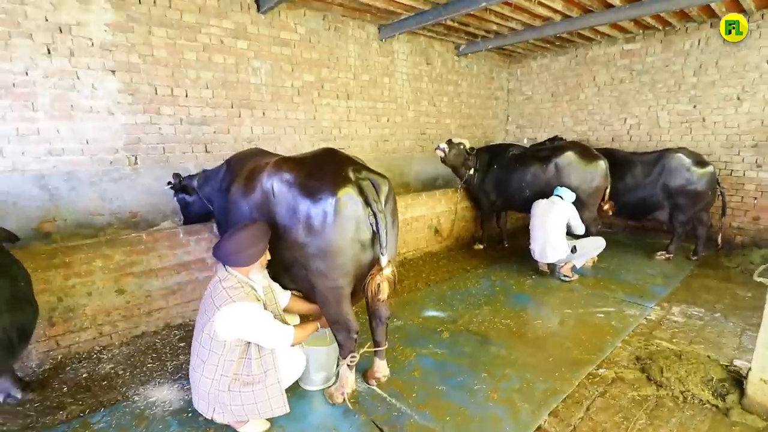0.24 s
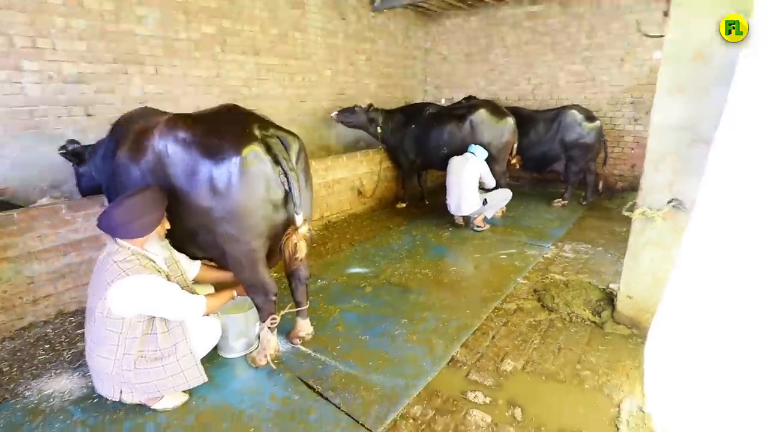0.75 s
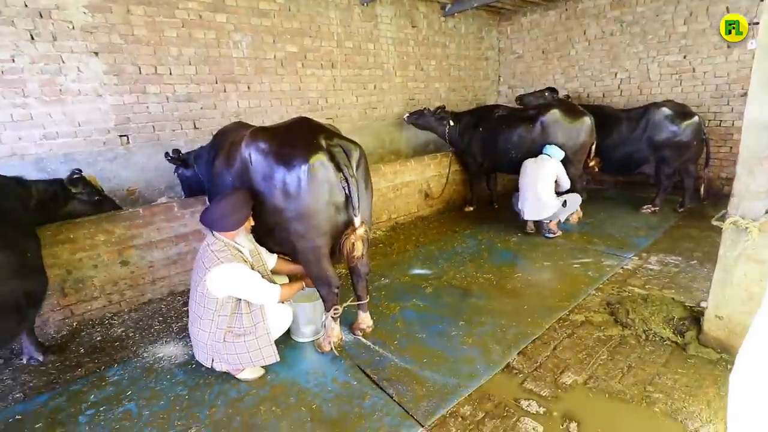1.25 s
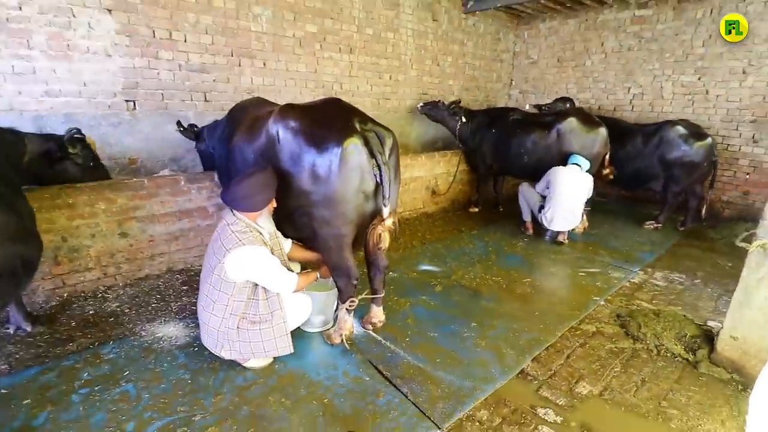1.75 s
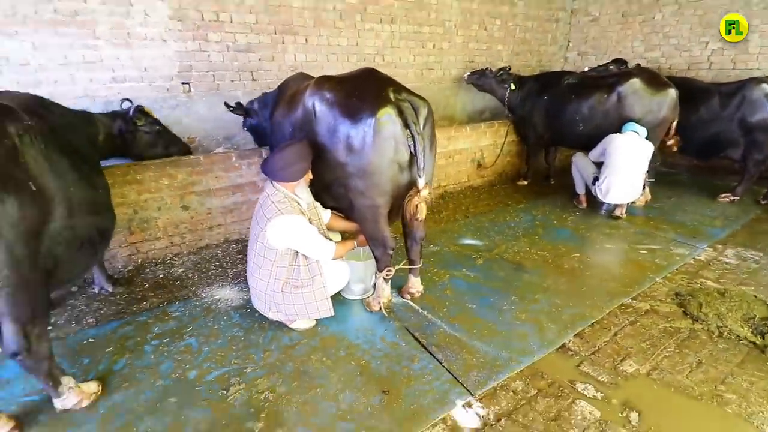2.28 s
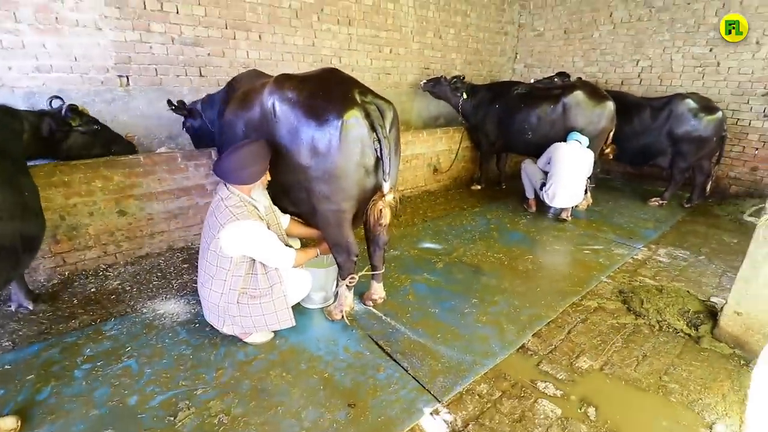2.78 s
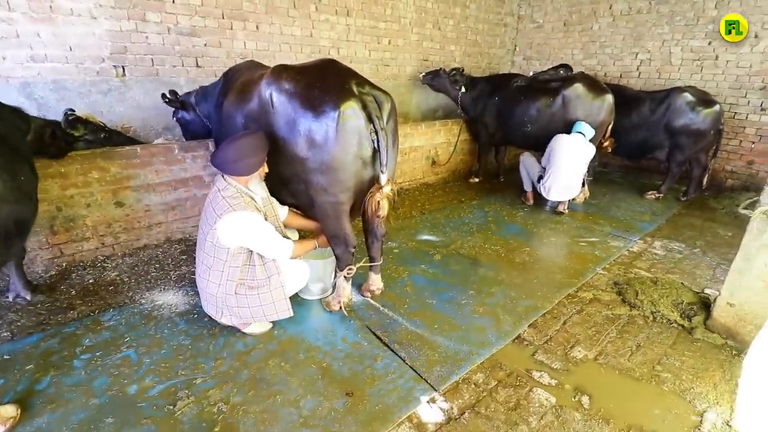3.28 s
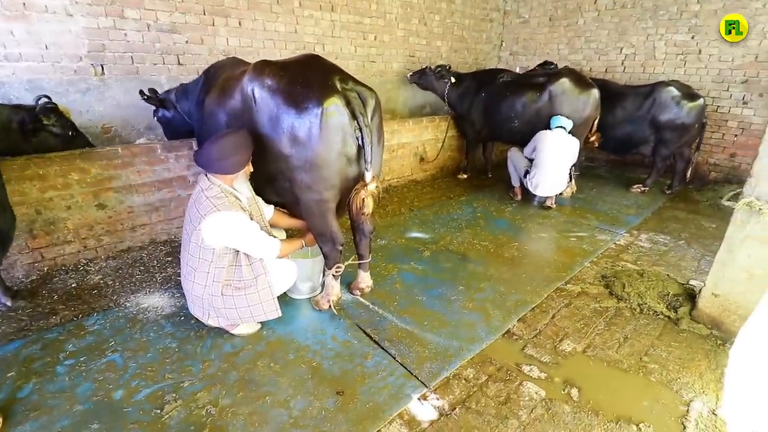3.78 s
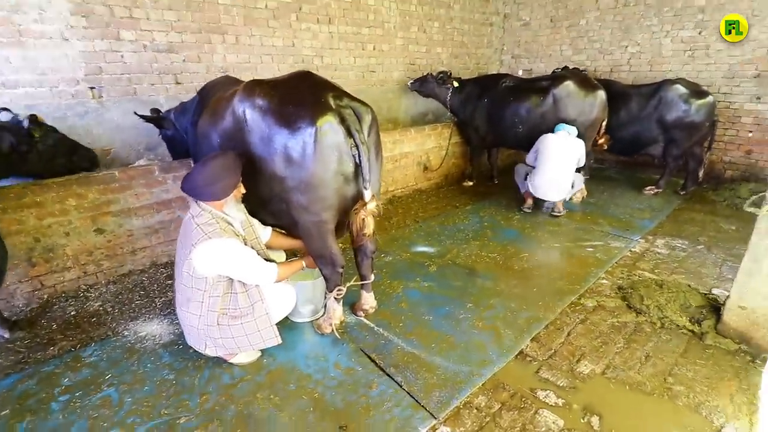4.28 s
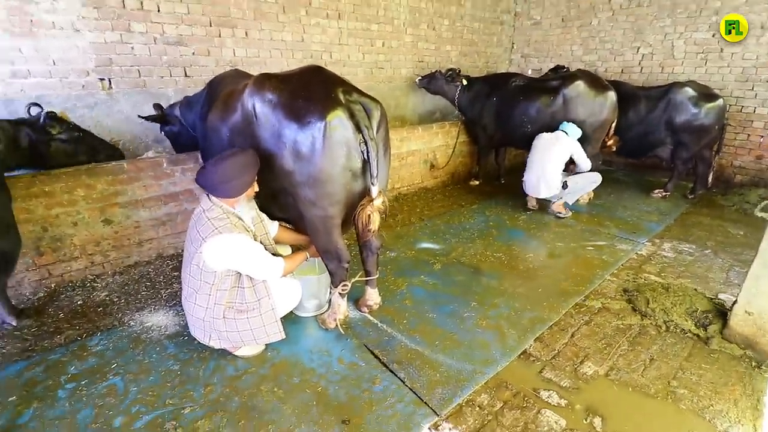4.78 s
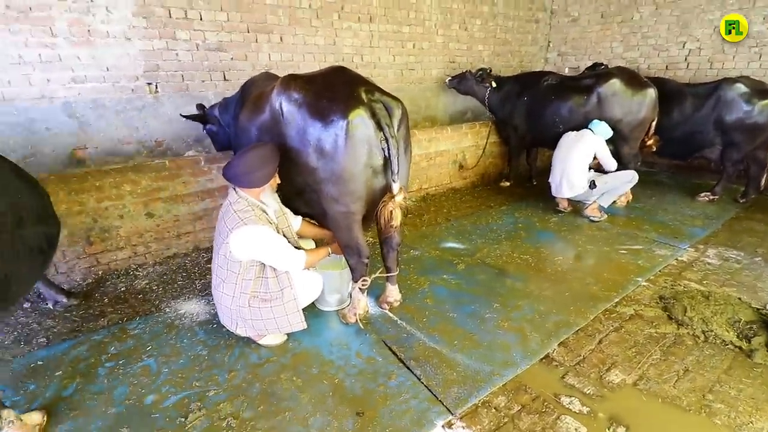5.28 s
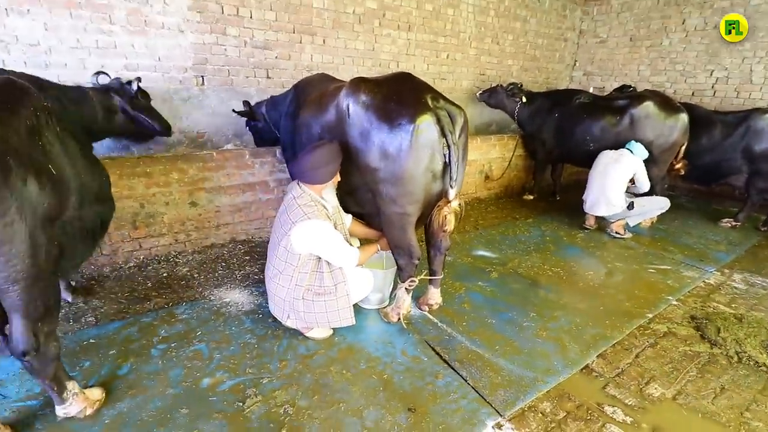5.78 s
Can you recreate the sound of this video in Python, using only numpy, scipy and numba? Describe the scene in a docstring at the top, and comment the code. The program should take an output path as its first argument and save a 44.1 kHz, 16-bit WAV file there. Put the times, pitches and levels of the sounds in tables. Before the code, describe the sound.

A handheld phone in a brick animal shed picks up milk squirting into a frothy metal bucket. A soft, bright hiss runs throughout, spluttering and dipping briefly between squirts, with faint pail resonance. From 0 to 0.8 s many tiny high bubbles and drips blip over it, with close finger ticks near 0.1 s. At 1.25 s a wet, plinking splash stands out, followed by busy bubbling until about 2 s; a tick and snap fall at 1.7 s. Thin faint squeaks flutter around 2.3 to 2.7 s, and small sharp spits recur. A double snap clicks at 3.37 s. Drips become sparse. At 4.63 s a soft scuff precedes a loud, hard clack at 4.75 s, with quick duller bounces until 4.81 s and a short rattle. The hiss continues to 6 s, with a few spits and drips over a very quiet low hum and dull thumps.

```python
"""Hand milking in a brick shed

Jets of milk hiss into the froth of a metal bucket: noise and tiny rings drive the bucket's resonances.
Gliding sine rings make bubbles, drips and squeaks; puffs of filtered noise make spits and splashes.
Beneath lie a murmur and a wavering low hum with dull thumps, from filtered noise and low rings.
Fingers tick and snap on a phone; after a soft scuff, a hard object clacks and bounces as ringing modes.
"""
import sys
import numpy as np
from scipy import signal
from scipy.fft import rfft, irfft
from scipy.io import wavfile
from scipy.ndimage import uniform_filter1d
from numba import njit

SR = 44100
rng = np.random.default_rng(int(sys.argv[2]) if len(sys.argv) > 2 else 0)


def master_out(mix):
    """Clip the mix to full scale and print it as 16-bit PCM to the path in sys.argv[1]."""
    frames = np.transpose(np.atleast_2d(mix))
    ceiling = np.clip(frames, -1, 1)
    pcm = np.round(ceiling * 32767).astype(np.int16)
    wavfile.write(sys.argv[1], SR, pcm)


N = 266408

# murmur of the shed, relative spectrum: (pitch_hz, level_db per Hz)
SHED_COLOUR = [(15, -61), (25, -19), (70, -14), (113, -10.5), (173, -14), (341, -14.5), (532, -14),
               (1080, -14.5), (1300, -8), (1690, -36), (2860, -120)]
SHED_EDGES_HZ = [20, 170, 350, 700, 1250]
# level before the slow swell; side level relative to the middle
SHED_DB, SHED_SIDE_DB = -69.5, -23.5

# level of the low hum: (start_s, level_db)
HUM_LEVELS = [(0.0, -54), (0.32, -64), (0.6, -76), (0.94, -66.5), (1.09, -72), (1.39, -77), (1.58, -67),
              (1.64, -63), (1.69, -60), (1.77, -68), (2.0, -67), (2.1, -75), (2.4, -63.5), (2.58, -79.5),
              (2.73, -62.5), (2.81, -72), (3.33, -74), (3.38, -81), (3.6, -87), (3.64, -70.5),
              (3.97, -74.5), (4.05, -61.5), (4.22, -71.5), (4.37, -68.5), (4.91, -70.5), (5.25, -71.5),
              (5.38, -67), (5.6, -71.5), (6.04, -80)]
HUM_HZ, HUM_WIDTH_HZ = 118.2, 28.4  # the width of each of two equal resonances in a row

# thumps that ring near the pitch of the hum: (start_s, peak_db, pitch_hz, t60_s)
THUMP_EVENTS = [(0.083, -60, 119, 0.15), (0.155, -59, 114, .18), (0.224, -58, 118, .18),
                (0.41, -56, 116.5, 0.2), (0.752, -56, 110, 0.13), (0.923, -54.5, 116, 0.12),
                (1.593, -46, 122, 0.092), (1.958, -55, 126, 0.13), (2.389, -58, 113, .18),
                (2.515, -54, 110, 0.19), (4.277, -52, 127, 0.2), (4.356, -50.5, 121, 0.17),
                (5.012, -53.5, 116, 0.2), (5.368, -54, 120.5, 0.16), (5.571, -49, 114.7, 0.24)]

# soft scuff ahead of the clack, with its relative spectrum: (pitch_hz, level_db)
SCUFF_S, SCUFF_DB, SCUFF_ATTACK_S, SCUFF_T60_S = 4.625, -47, .008, 0.22
SCUFF_COLOUR = [(750, -8), (1000, 2), (1500, -7), (2200, -6), (3500, -8), (5000, -10), (9000, -12)]

# finger ticks: (start_s, peak_db, pitch_hz, t60_s, undertone_db relative to the tick)
TICK_EVENTS = [(0.103, -40, 470, .026, -8.5), (0.14, -53, 209, 0.032, 0), (0.259, -53, 287, .02, -11),
               (0.604, -60.5, 403, 0.029, 3), (0.956, -61, 930, .028, -11), (1.245, -51, 790, 0.016, -5),
               (1.584, -54, 424, 0.027, -16), (1.594, -54, 373, 0.033, -10), (1.7215, -42, 572, 0.018, -17),
               (1.909, -58, 376, 0.044, -2), (2.001, -61.5, 376, 0.042, 3.5),
               (3.374, -46.5, 1015, 0.015, -1.5), (3.376, -49.5, 756, .014, -8),
               (4.289, -53.5, 204, 0.021, -6), (4.361, -56.5, 306, 0.036, 3),
               (4.392, -50.5, 216, 0.039, -4), (4.53, -58, 947, 0.037, -5), (4.659, -54, 980, .04, -16),
               (4.777, -56, 1100, .025, -15), (4.75, -49.5, 295, 0.062, -7),
               (4.873, -50, 850, 0.0066, -3.5)]
TICK_OVERTONE_DB = -6.5  # relative to the tick
FAINT_TICK_DB, FAINT_TICKS_END_S = -62, 2.8  # middle of their peak levels; latest start

# sharp one-sided snaps, levels ahead of the bass cut: (start_s, peak_db)
SNAP_EVENTS = [(0.1056, -41), (1.7248, -38), (1.7266, -35.5), (1.7304, -48), (2.762, -50), (3.371, -47),
               (3.376, -40), (3.378, -35), (3.3801, -38), (4.534, -45), (4.627, -54), (4.8772, -46)]
SNAP_WIDTH_S, SNAP_LOW_HZ = 0.000081, 352

# clack and bounces: (start_s, ring_db, tuning_ratio of the low modes, treble_db relative,
# rattle_db, rattle_t60_s)
CLACK_EVENTS = [(4.7452, -11.5, 1, -1.5, -27.5, 0.12), (4.7652, -39, 1.1, 10, -41, .02),
                (4.7815, -33, 0.94, 4, -37, 0.034), (4.793, -26, 0.87, -15, -33, 0.05),
                (4.7965, -37, .9, -20, -38, .04), (4.802, -37, 0.95, -26, -34, 0.035),
                (4.806, -34, 0.73, -30, -35, 0.054)]
# modes of the hard object: (pitch_hz, level_db relative to ring_db, t60_s, swell_s)
OBJECT_MODES = [(2226, -9.5, 0.024, 0.0049), (2700, -6.5, 0.022, 0.003), (2964, -1, 0.011, 0.00173),
                (3470, -16, 0.035, 0.0018), (4600, -20, 0.066, .003), (5090, -14.5, 0.025, 0.00099),
                (5950, -15, 0.019, 0.0012), (6400, -27, 0.065, 0.024), (6740, -29, 0.077, 0.017),
                (9380, -24, 0.03, 0.0033), (12360, -21, 0.06, .008), (13200, -20, 0.09, 0.0077),
                (13700, -25, .05, .006), (15010, -30, .06, .002)]
# relative spectrum of the rattle: (pitch_hz, level_db)
RATTLE_COLOUR = [(900, -25), (1400, -15), (2200, -8), (4000, -7.5), (6500, -9.0), (8000, -12),
                 (11000, -10.0), (13000, -8), (14000, -8), (16000, -3.5)]
BOUNCE_SCATTER_DB = 1.5  # each bounce excites the modes a little differently
CLACK_FLUTTER_DB = 6.5  # scales the random flutter of the high modes

# faint thin squeaks, levels ahead of the flutter: (start_s, peak_db, pitch_hz, length_s, rise_share)
SQUEAK_EVENTS = [(.56, -66, 2190, 0.15, .013), (.60, -55.5, 1850, 0.12, 0.017),
                 (2.27, -49, 1790, .035, .02), (2.305, -53, 1830, .03, .015),
                 (2.33, -49.5, 1840, 0.04, 0.02), (2.5, -62, 4450, 0.079, -0.00013),
                 (2.51, -61, 1900, 0.037, -0.0057), (2.545, -60, 1830, .035, -.02),
                 (2.585, -57, 1750, .025, -0.015), (2.61, -56, 1786, 0.033, -0.017),
                 (2.72, -56, 1880, 0.026, 0.049)]

# drops of spray that spit against the rim: (start_s, approximate peak_db, pitch_hz)
SPIT_EVENTS = [(1.8845, -35, 8200), (2.3366, -36.5, 9300), (2.6444, -36, 13100), (2.8986, -32.5, 8700),
               (2.9836, -41, 8424), (3.85, -35, 8350), (3.9335, -35, 9900), (4.0337, -36, 14500),
               (5.2724, -35, 11800), (5.5807, -38, 8500)]
FAINT_SPIT_DB = -43  # middle of their levels
PUFF_SAMPLES = 900

# splashes around the largest drips: (start_s, level_db, t60_s)
SPLASH_EVENTS = [(1.241, -36, 0.12), (1.254, -44, .06), (1.262, -29, 0.029)]
# relative spectrum of the splashes: (pitch_hz, level_db)
SPLASH_COLOUR = [(1500, -11), (2500, -2.0), (6500, -3.5), (8000, -12), (12000, 5.0), (14000, -7), (16000, -6)]

# loud bubbles and drips: (start_s, peak_db, pitch_hz, length_s, rise_share)
BUBBLE_EVENTS = [(0.044, -33.5, 3370, 0.005, 0.03), (0.063, -41, 3250, 0.0071, 0),
                 (0.132, -39.5, 3190, 0.018, 0.058), (0.207, -50, 5900, .022, -.04),
                 (0.223, -44, 3270, 0.014, 0.016), (0.282, -49, 6450, 0.017, -.1),
                 (0.303, -44, 5100, .012, -.08), (0.307, -49, 6350, .01, -.05), (0.335, -46, 5050, .007, 0),
                 (0.381, -49, 6370, .011, .03), (0.44, -52, 5930, .012, .03), (0.583, -48, 4680, .011, 0),
                 (0.633, -47, 5670, 0.013, -0.012), (0.669, -46, 4050, 0.015, .01),
                 (0.743, -47, 4000, .009, -.03), (0.752, -47, 4050, .01, -.02), (0.788, -49, 6480, 0.01, 0),
                 (0.789, -45, 4950, .009, -.04), (0.24, -30.5, 3320, 0.0039, 0.027),
                 (0.245, -38, 3300, 0.0025, 0), (0.274, -42, 3540, 0.0083, 0.015),
                 (0.308, -43.5, 3400, 0.013, .01), (0.336, -48, 6250, 0.016, -.1),
                 (0.41, -39, 3460, 0.0053, -0.00076), (0.425, -41, 4030, 0.0064, 0.018),
                 (0.479, -41, 3290, .011, .02), (0.567, -40.5, 3290, 0.019, 0.032),
                 (0.687, -42, 1866, 0.0092, -0.0063), (0.702, -44, 4300, 0.016, -0.000026),
                 (0.765, -42, 1916, 0.011, -0.02), (0.961, -44, 1426, 0.0074, 0),
                 (1.243, -28, 2000, 0.0074, .01), (1.245, -44, 4000, .006, .02),
                 (1.247, -43, 6100, .006, 0), (1.263, -31, 1970, 0.0068, 0.071),
                 (1.262, -42, 7000, .008, 0.018), (1.266, -34, 4500, 0.0065, 0.026),
                 (1.2664, -25, 2530, 0.0032, .06), (1.2655, -39, 12100, .007, 0.04),
                 (1.2695, -39, 5300, .004, -.05), (1.25, -44, 6000, .003, 0), (1.271, -41, 4090, 0.0036, 0),
                 (1.272, -39, 2330, 0.0087, -.03), (1.273, -47, 6950, .011, 0),
                 (1.276, -40, 3580, .013, -0.097), (1.294, -44, 3120, .012, 0.048),
                 (1.341, -46, 6200, 0.0086, 0.047), (1.342, -42, 5830, 0.01, -0.027),
                 (1.347, -38.5, 4180, 0.017, 0.021), (1.357, -35.5, 4540, 0.014, -0.037),
                 (1.363, -45, 6660, 0.01, -.02), (1.386, -46, 5650, .01, -.03),
                 (1.393, -46.5, 1875, .015, 0.0093), (1.4, -40.5, 3770, .006, .03),
                 (1.422, -46, 4180, .012, -.1), (1.443, -47, 3150, 0.013, .08), (1.59, -48, 5100, .01, .04),
                 (1.789, -45, 6100, 0.0087, 0.039), (1.81, -51, 6350, .005, -.02),
                 (1.829, -44, 5150, .008, -.06), (1.918, -47, 4150, .009, 0), (1.991, -48, 6900, .01, 0),
                 (1.436, -43, 3570, 0.0057, -0.0065), (1.481, -47, 5470, 0.0089, -.02),
                 (1.482, -54, 6500, .007, .05), (1.503, -52, 6250, 0.0071, .02),
                 (1.52, -53, 6400, .009, -.02), (1.518, -43, 4810, 0.011, -0.047),
                 (1.522, -43, 1630, 0.0049, 0), (1.536, -42, 3070, 0.0095, 0.045),
                 (1.541, -50, 7100, .007, .02), (1.542, -44, 3360, 0.011, .02),
                 (1.545, -45, 4300, .014, 0.0093), (1.562, -47, 4650, .008, 0),
                 (1.569, -44, 6100, 0.0098, -.01), (1.593, -43, 7000, 0.012, .04),
                 (1.599, -40, 7330, .005, -0.014), (1.602, -38, 5580, 0.0081, .02),
                 (1.614, -42, 3600, .012, -.05), (1.618, -39, 5440, 0.0069, -.03),
                 (1.632, -40, 5560, 0.011, -.07), (1.796, -41.5, 6450, 0.011, 0.051),
                 (1.809, -37.5, 4640, 0.011, -0.09), (1.83, -43, 6360, 0.011, -0.048),
                 (1.836, -39, 4610, 0.0051, -.02), (1.881, -47, 1430, 0.017, -0.0015),
                 (1.958, -41, 3000, 0.0056, 0.0064), (1.961, -36.5, 3420, 0.0042, 0.0064),
                 (2.002, -40, 6350, 0.0068, 0.023), (2.008, -41, 4750, 0.0049, -.03),
                 (2.174, -47, 1650, 0.023, 0.0044), (2.212, -50, 1675, .018, -.03),
                 (2.241, -39, 3300, 0.0044, .02), (2.282, -53, 4550, .008, 0), (2.335, -44, 4520, .008, 0),
                 (2.435, -47.5, 1380, 0.011, 0), (2.456, -48, 5430, 0.013, -0.0078),
                 (2.507, -41.5, 3350, 0.013, 0.039), (2.53, -43, 4060, 0.0072, .06),
                 (2.646, -51, 4170, .006, .03), (2.649, -44, 4330, 0.016, .01),
                 (2.673, -42.5, 4050, 0.0095, 0.017), (2.712, -45, 4730, .008, 0),
                 (2.913, -47, 1824, 0.026, -0.0097), (2.929, -47, 5520, 0.022, 0),
                 (2.963, -42, 4820, .0079, 0.0071), (2.996, -41, 3300, 0.0049, 0.0022),
                 (3.344, -36, 3250, 0.003, 0.019), (3.346, -43, 2700, .005, 0), (3.402, -44, 3200, .004, 0),
                 (3.48, -39, 3460, 0.0031, 0), (3.672, -38.5, 3620, 0.0061, .01),
                 (4.195, -39.5, 1960, 0.0044, 0.0088), (4.631, -42, 1530, 0.0029, 0),
                 (4.641, -38, 3700, 0.0082, 0.000036), (4.642, -40, 4150, 0.0049, 0),
                 (4.722, -40, 2970, 0.0054, 0), (5.187, -42, 2760, .005, 0.0076),
                 (5.673, -41.5, 3456, 0.016, 0.003)]
# spells of random fainter bubbles: (start_s, end_s, lowest_hz, highest_hz, mean_peak_db)
FAINT_BUBBLE_SPELLS = [(0, 6.04, 2550, 3700, -47), (0.279, .8, 4450, 6600, -50),
                       (1.3, 1.66, 3570, 7300, -51), (2.4, 2.75, 3800, 5460, -50)]
# number of bubbles in each spell: (count)
FAINT_BUBBLE_COUNTS = [40, 24, 44, 18]
GLIDE_SPREAD = 0.032  # largest share of pitch by which a faint bubble rises or falls

# level of the jets' hiss in five parts, ahead of the lulls:
# (start_s, hollow_db, lower_body_db, upper_body_db, sizzle_db, top_spray_db)
JET_LEVELS = [(0.0, -51.5, -56, -51, -51.5, -52), (0.15, -53.5, -55.5, -50, -53.5, -52.5),
              (0.39, -54.5, -56.5, -52, -54, -53.5), (0.74, -55.5, -55, -53.5, -54.5, -54.5),
              (0.97, -55.5, -56, -53.5, -55.5, -53.5), (1.24, -55, -55, -53.5, -54.5, -54),
              (1.46, -56.5, -53.5, -54.5, -57, -54.5), (1.63, -55.5, -53, -52.5, -55.5, -53.5),
              (1.83, -53, -56.5, -52.5, -51.5, -52.5), (1.98, -55, -53, -50.5, -53, -53.5),
              (2.12, -54, -55, -52, -54.5, -55), (2.35, -56, -54, -51.5, -55, -53),
              (2.67, -56.5, -53, -51.5, -54, -54.5), (3.08, -55.5, -53, -52.5, -54, -53),
              (3.3, -57, -54, -55.5, -53.5, -54), (3.48, -55.5, -52, -54, -54, -54),
              (3.65, -55, -52.5, -52, -54, -54), (3.8, -55.5, -52.5, -51.5, -54, -54),
              (4.16, -56.5, -52.5, -53, -54, -54), (4.31, -57, -54.5, -52.5, -54, -55),
              (4.64, -56, -52, -50.5, -53, -54.5), (4.84, -58, -53, -54.5, -55, -55.5),
              (5.05, -56.5, -53.5, -52, -53, -54.5), (5.23, -55.5, -52, -53, -53, -53.5),
              (5.58, -55, -54, -54, -54, -55), (5.77, -56, -51, -50.5, -53, -55.5),
              (5.9, -55, -51, -57, -55.5, -55), (6.04, -60, -53, -51, -51.5, -55)]
# relative spectrum of the hiss: (pitch_hz, level_db per Hz)
HISS_COLOUR = [(530, -54), (900, -23), (1080, -26), (1380, -12.5), (1520, -17.5), (1640, -16),
               (2130, -12.5), (2710, -10), (3280, -10), (3970, -11.5), (4690, -11), (6180, -16),
               (8230, -14.5), (13900, -13.5), (15700, -13.5)]
HISS_EDGES_HZ = [900, 1700, 2400, 3100, 4000, 5200, 7000, 9500, 12500, 16500]
# resonances of the metal bucket: (pitch_hz, width_hz, level_db relative to one another)
BUCKET_MODES = [(1445, 40, -13), (1717, 26, -2), (1880, 24, -6), (2670, 39, -2.5), (2954, 66, -1),
                (3186, 36, 0.5), (3407, 48, 1), (4610, 36, -3), (5380, 680, -13), (8190, 490, -8.5)]
# lulls between squirts, at full depth only in the hollow part: (start_s, end_s, depth_db)
SQUIRT_LULLS = [(0.019, 0.09, -8), (0.136, 0.2, -7.5), (1.686, 1.722, -10), (1.732, 1.793, -9),
                (2.475, 2.516, -8), (3.289, 3.327, -10.5), (3.352, 3.47, -5), (3.988, 4.06, -4)]
SPATTER_TOP = 3  # piled-up droplets level off here

TOP_HZ = 15700


def undb(db):
    """Turns decibels into a gain."""
    return 10 ** (np.asarray(db) / 20)


def level(x, db):
    """Sets the rms level of a signal."""
    return x * undb(db) / np.sqrt(np.mean(x ** 2))


def curve(s, v):
    """Draws straight lines between values at given seconds."""
    return np.interp(np.arange(N) / SR, s, v)


def walk(rate_hz):
    """Random levels, drawn at the given rate and slewed from one to the next; spread about 0.4."""
    k = int(SR / rate_hz)
    steps = np.repeat(rng.standard_normal(N // k + 1), k)
    return 0.5 * uniform_filter1d(steps, k)[:N]


def bands(x, colour, edges_hz):
    """Colours a signal by (pitch_hz, level_db) points and splits it at the edges."""
    hz = np.fft.rfftfreq(N, 1 / SR) + 1e-3
    points = np.array(colour, float)
    gain_db = np.interp(np.log(hz), np.log(points[:, 0]), points[:, 1])
    spectrum = rfft(x) * undb(gain_db)
    return [irfft(spectrum * ((hz >= lo) & (hz < hi)), N) for lo, hi in zip(edges_hz[:-1], edges_hz[1:])]


def burst(s, db, t60, attack):
    """Envelope that rises fast and dies away."""
    t = np.arange(N) / SR - s
    return np.clip(t / attack, 0, 1) * undb(db - 60 * np.maximum(t, 0) / t60)


@njit
def add(out, s, gain, hz, attack, t60, rise, hold):
    """Adds sine rings that swell, hold, die away and glide by a share of their pitch."""
    for e in range(len(s)):
        start, phase = int(s[e] * SR), 0.
        glide_s = attack[e] + hold[e] + t60[e] / 3
        for i in range(int((attack[e] + hold[e] + t60[e]) * SR)):
            t = i / SR
            phase += 2 * np.pi * hz[e] * (1 + rise[e] * t / glide_s) / SR
            swell = np.sin(np.pi / 2 * min(t / attack[e], 1.)) ** 2
            decay = 10 ** (-3 * max(t - attack[e] - hold[e], 0.) / t60[e])
            if 0 <= start + i < len(out):
                out[start + i] += gain[e] * swell * decay * np.sin(phase)


def rings(s, db, hz, attack, t60, rise=0., hold=0.):
    """Sums the sine rings of many events; single values serve all of them."""
    out = np.zeros(N)
    columns = np.broadcast_arrays(s, db, hz, attack, t60, rise, hold)
    s, db, hz, attack, t60, rise, hold = (np.ascontiguousarray(v, float) for v in columns)
    add(out, s, undb(db), hz, np.maximum(attack, 1e-4), np.maximum(t60, 1e-3), rise, np.maximum(hold, 0.))
    return out


def shed():
    """Murmur of air and animals: wavering noise bands that swell a little with the hum, partly stereo."""
    s, db = np.transpose(HUM_LEVELS)
    swell = undb(0.12 * curve(s, db - np.mean(db)))
    mid_bands = bands(rng.standard_normal(N), SHED_COLOUR, SHED_EDGES_HZ)
    mid = sum(b * undb(2.1 * walk(7.3) + 3.6 * walk(25)) for b in mid_bands)
    side_bands = bands(rng.standard_normal(N), SHED_COLOUR, SHED_EDGES_HZ)[1:3]
    side = sum(b * undb(1.9 * walk(9)) for b in side_bands)
    opposite = np.array([[1], [-1]])  # the side has opposite signs in the two channels
    return swell * (level(mid, SHED_DB) + level(side, SHED_DB + SHED_SIDE_DB) * opposite)


def hum():
    """Noise passes twice through one low resonance and wavers in level."""
    s, db = np.transpose(HUM_LEVELS)
    resonance = signal.iirpeak(HUM_HZ, HUM_HZ / HUM_WIDTH_HZ, SR)
    drone = signal.lfilter(*resonance, signal.lfilter(*resonance, rng.standard_normal(N)))
    wavering = drone * undb(1.7 * walk(6.9))
    return level(wavering, 0) * undb(curve(s, db))


def thumps():
    """Dull thumps are soft-edged rings near the pitch of the hum."""
    s, db, hz, t60 = np.transpose(THUMP_EVENTS)
    return rings(s, db, hz, 0.0097, t60)


def scuff():
    """A rough, broken rub: a burst of coloured noise with a fast random flutter."""
    rub = bands(rng.standard_normal(N), SCUFF_COLOUR, [750, 10000])[0]
    return burst(SCUFF_S, SCUFF_DB, SCUFF_T60_S, SCUFF_ATTACK_S) * level(rub, 0) * undb(7 * walk(144))


def ticks(count=18):
    """Short dull rings with an overtone and an undertone; faint random ones crowd towards the start."""
    c = rng.random((count, 3)).T
    faint_s = c[0] ** 1.4 * FAINT_TICKS_END_S
    faint_db = FAINT_TICK_DB + 6 * (c[1] - .5)
    faint_hz = 230 * 2.59 ** c[2]
    faint = zip(faint_s, faint_db, faint_hz, np.full(count, 0.03), np.full(count, -8.))
    s, db, hz, t60, under_db = np.transpose(list(TICK_EVENTS) + list(faint))
    body = rings(s, db, hz, 0.0037, t60)
    overtone = rings(s, db + TICK_OVERTONE_DB, 1.94 * hz, 0.0029, 0.64 * t60)
    undertone = rings(s, db + under_db, 0.575 * hz, 0.002, t60)
    return body + overtone + undertone


def snaps():
    """Brief one-sided pushes of pressure; the casing thins their bass."""
    t = np.arange(N) / SR
    push = sum(undb(db) * np.exp(-.5 * ((t - s) / SNAP_WIDTH_S) ** 2) for s, db in SNAP_EVENTS)
    return signal.lfilter(*signal.butter(1, SNAP_LOW_HZ, "high", fs=SR), push)


def clacks():
    """Each blow rings the object's modes and leaves a short noisy rattle; most bounces are duller."""
    out = np.zeros(N)
    hz, mode_db, t60, swell = np.transpose(OBJECT_MODES)
    dull, bright = bands(rng.standard_normal(N), RATTLE_COLOUR, [800, 3800, 16500])
    scale = 1 / np.std(dull + bright)
    low = hz < 4000
    high = ~low
    flutter = undb(CLACK_FLUTTER_DB * walk(700))
    for s, db, ratio, treble_db, rattle_db, rattle_t60 in CLACK_EVENTS:
        is_bounce = s > CLACK_EVENTS[0][0]
        peak_db = db + mode_db + BOUNCE_SCATTER_DB * rng.standard_normal(len(hz)) * is_bounce
        out += rings(s, peak_db[low], ratio * hz[low], swell[low], t60[low], -0.029)
        out += rings(s, peak_db[high] + treble_db, hz[high], swell[high], t60[high], -0.013) * flutter
        rattle = scale * (dull + undb(min(0.78 * treble_db, 0)) * bright)
        out += burst(s, rattle_db, rattle_t60, 0.0011) * rattle
    return out


def squeaks():
    """Thin gliding tones that flutter in level."""
    s, db, hz, length, rise = np.transpose(SQUEAK_EVENTS)
    return rings(s, db, hz, 0.88 * length, 2.4 * length, rise) * undb(6.8 * walk(40.14))


def spits(count=17):
    """Short puffs of noise, resonated about a pitch; faint ones come at random."""
    out = np.zeros(N + PUFF_SAMPLES)
    c = rng.random((count, 3)).T
    faint_db = FAINT_SPIT_DB + 6 * (c[1] - .5)
    faint = zip(c[0] * N / SR, faint_db, 8000 * (1 + 0.23 * c[2] ** 2))
    i = np.arange(PUFF_SAMPLES)
    fade = np.minimum(i / 40, 1) * undb(-60 * i / SR / 0.021)
    for s, db, hz in list(SPIT_EVENTS) + list(faint):
        resonance = signal.iirpeak(hz, 6.0, SR)
        noise = signal.lfilter(*resonance, signal.lfilter(*resonance, rng.standard_normal(PUFF_SAMPLES)))
        puff = level(noise, db - 20 * np.log10(2))  # the peak of noise stands about twice over its rms
        start = int(s * SR)
        out[start:start + PUFF_SAMPLES] += puff * fade
    return out[:N]


def splashes():
    """Short bright bursts of noise spray around the big drips."""
    spray = level(bands(rng.standard_normal(N), SPLASH_COLOUR, [1200, 16500])[0], 0)
    return sum(burst(s, db, t60, 0.0047) for s, db, t60 in SPLASH_EVENTS) * spray


def faint_bubbles():
    """Rows like those of the loud bubbles, drawn at random within each spell."""
    rows = []
    for (start, end, low_hz, high_hz, mean_db), count in zip(FAINT_BUBBLE_SPELLS, FAINT_BUBBLE_COUNTS):
        c = rng.random((count, 5)).T
        s = start + (end - start) * c[0]
        db = mean_db + 7 * (c[1] - .5)
        hz = low_hz * (high_hz / low_hz) ** c[2]
        length = 0.0019 + 0.005 * c[3]
        rise = GLIDE_SPREAD * (2 * c[4] - 1)
        rows += list(zip(s, db, hz, length, rise))
    return rows


def bubbles():
    """Single bubbles are rings that swell, glide and die away, each with a quieter neighbour just after."""
    s, db, hz, length, rise = np.transpose(list(BUBBLE_EVENTS) + faint_bubbles())
    c = rng.random((len(s), 2)).T
    main = rings(s, db, hz * (1 - rise / 2), 0.49 * length, 1.8 * length, rise, 0.18 * length)
    later_s = s + (0.9 + c[0]) * length
    neighbour = rings(later_s, np.minimum(db - 5, -43), hz * (.95 + .1 * c[1]), 0.0012, 0.015, rise)
    return main + neighbour


def froth(count=20000):
    """Countless small bubbles ring for some tens of cycles, a few louder than the rest."""
    c = rng.random((count, 4)).T
    hz = 1250 * (12.13 ** c[1])
    db = np.minimum(-2.4 * np.log(1 - c[2]), 11)
    return rings(c[0] * N / SR, db, hz, 8.85 / hz, (20 + 70 * c[3]) / hz, 0.042)


def spatter(rate=50, fade_s=0.0047):
    """Envelope of droplets that land at random, rate per second: quick rise, short fade."""
    hits = (rng.random(N) < rate / SR) * (0.17 + 5.2 * rng.random(N))
    fading = signal.lfilter([1], [1, -np.exp(-1 / (fade_s * SR))], hits)
    pile = uniform_filter1d(fading, size=120)
    return SPATTER_TOP * np.tanh(pile / SPATTER_TOP)


def jets():
    """Spray noise and froth ring the bucket; bands splutter together, flicker alone and fizz briefly."""
    s, *levels = np.transpose(JET_LEVELS)
    spray = level(rng.standard_normal(N), -0.33) + level(froth(), -5.5)
    ringing = sum(undb(db) * signal.lfilter(*signal.iirpeak(hz, hz / width, SR), spray)
                  for hz, width, db in BUCKET_MODES)
    fine = bands(spray + undb(4.5) * ringing, HISS_COLOUR, HISS_EDGES_HZ)
    t = np.arange(N) / SR
    lull_steps = sum(db * ((t > a) & (t < b)) for a, b, db in SQUIRT_LULLS)
    lull_db = uniform_filter1d(lull_steps, size=1000)
    splutter, surge, drops = walk(28), walk(6.9), spatter()
    groups = [fine[:2], fine[2:3], fine[3:4], fine[4:6], fine[6:]]
    wetness = [0.26, 0.17, 0.19, 0.34, 0.4]  # share of spatter in each part
    lull_shares = [1, 0.24, 0.16, 0.44, 0.4]
    out = 0
    for group, db, wet, lull in zip(groups, levels, wetness, lull_shares):
        shared, fizz = walk(12), spatter(rate=40, fade_s=0.0019)
        part = 0
        for band in group:
            flicker = undb(0.3 * splutter + 0.99 * surge + 0.5 * shared + 1.6 * walk(40))
            droplets = 0.8 * drops + 0.77 * fizz + 1.4 * spatter(rate=40, fade_s=0.0032)
            part = part + band * flicker * (1 + wet * droplets)
        out = out + level(part, 0) * undb(curve(s, db) + lull * lull_db)
    return out


def scene():
    """Sums all layers, from the background to the milk."""
    background = shed() + hum() + thumps()
    handling = scuff() + ticks() + snaps() + clacks()
    milk = squeaks() + spits() + splashes() + bubbles() + jets()
    return background + handling + milk


def record(dry):
    """The phone cuts the top with a steep low-pass filter."""
    return signal.sosfilt(signal.ellip(12, .2, 60, TOP_HZ, fs=SR, output="sos"), dry)


dry = scene()
out = record(dry)
master_out(out)
```